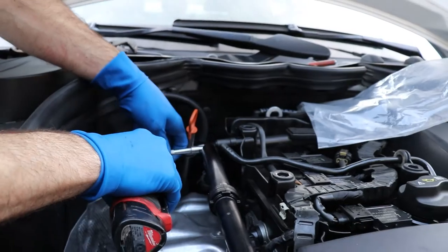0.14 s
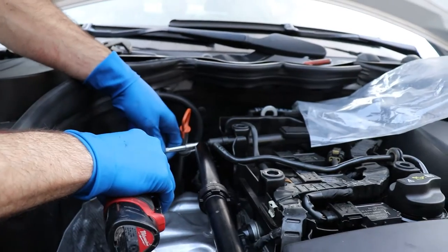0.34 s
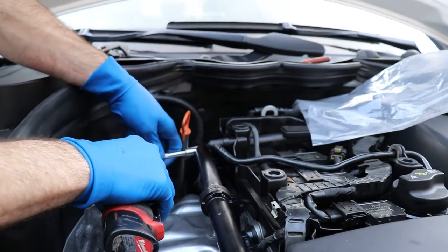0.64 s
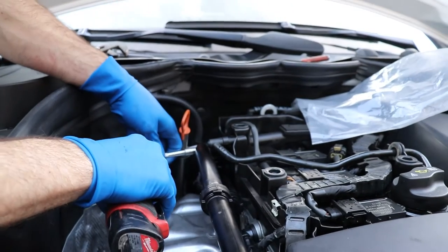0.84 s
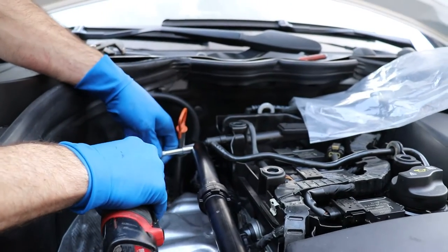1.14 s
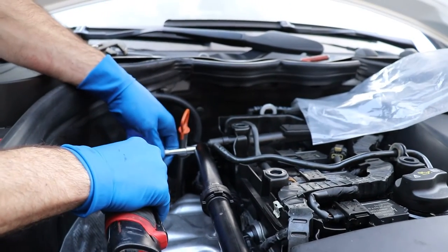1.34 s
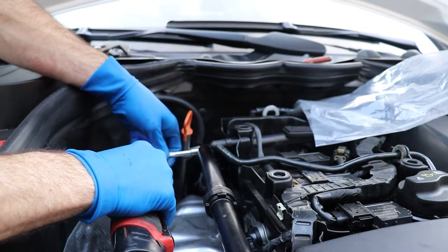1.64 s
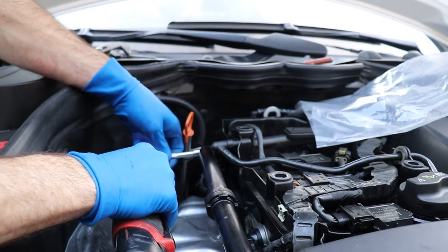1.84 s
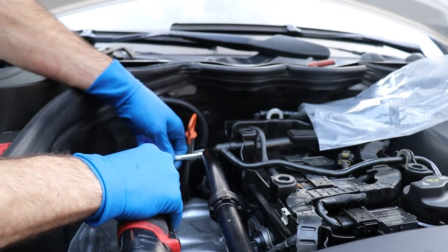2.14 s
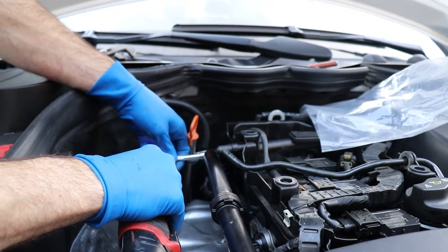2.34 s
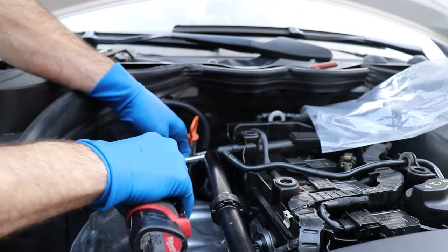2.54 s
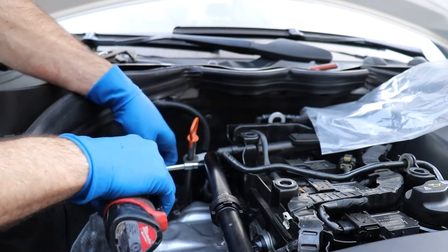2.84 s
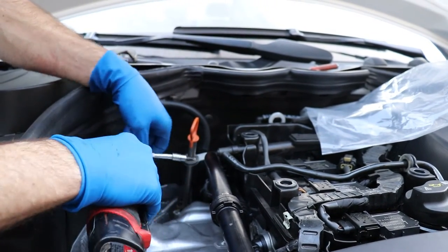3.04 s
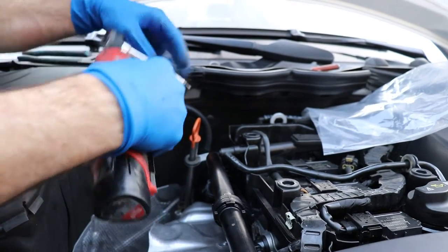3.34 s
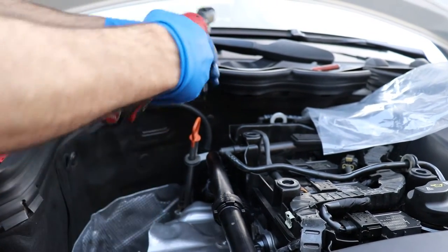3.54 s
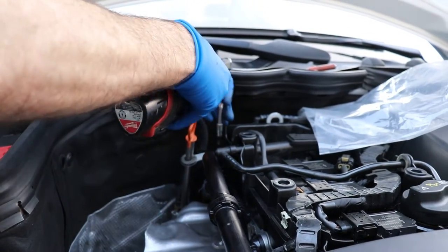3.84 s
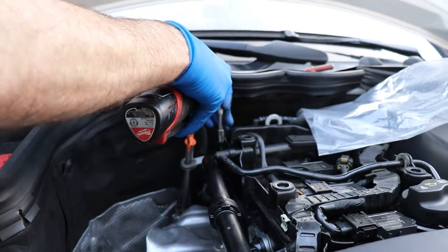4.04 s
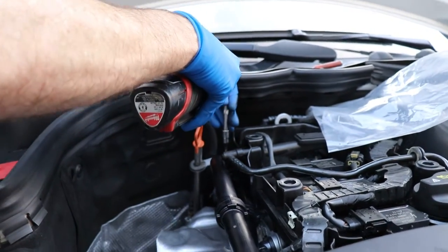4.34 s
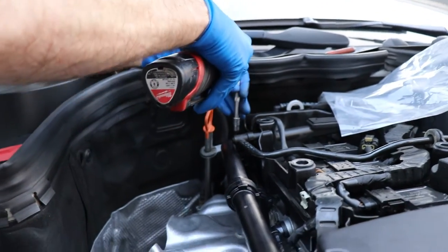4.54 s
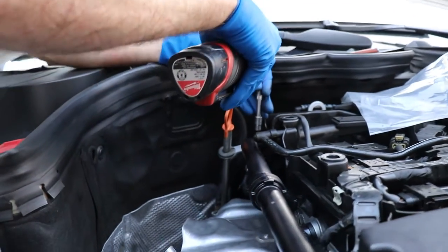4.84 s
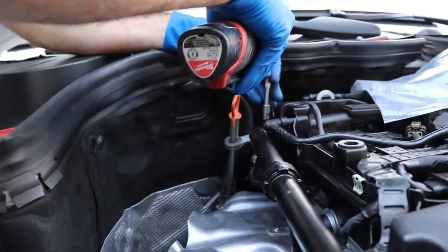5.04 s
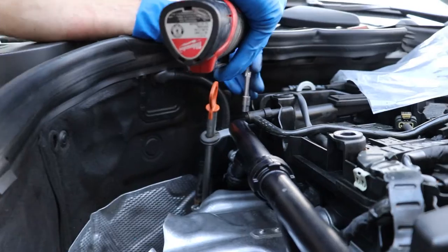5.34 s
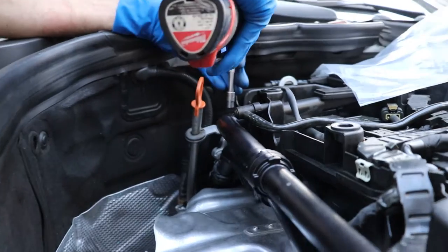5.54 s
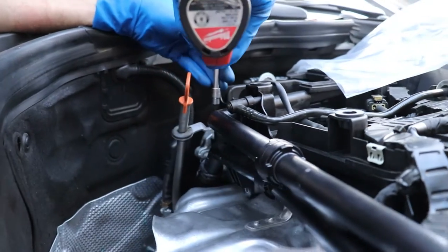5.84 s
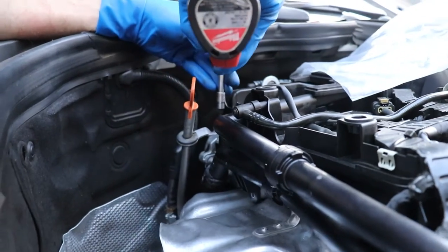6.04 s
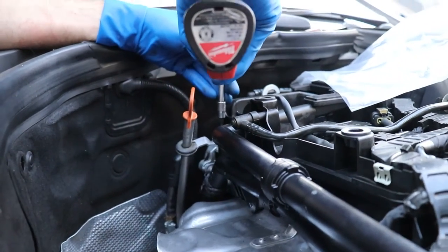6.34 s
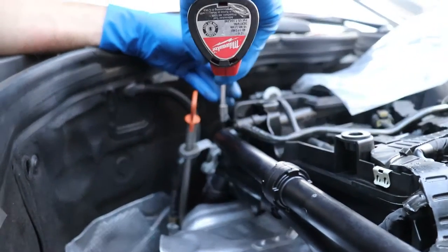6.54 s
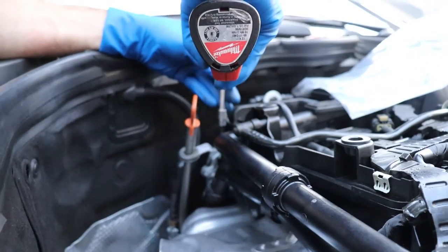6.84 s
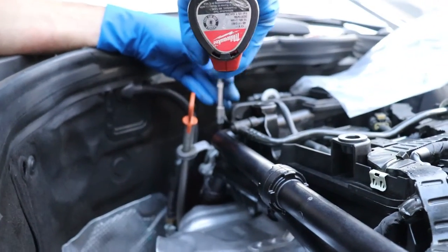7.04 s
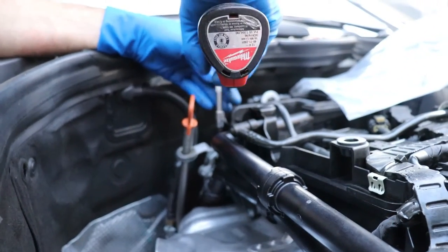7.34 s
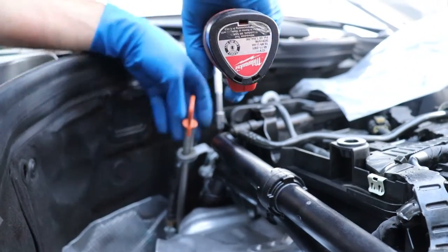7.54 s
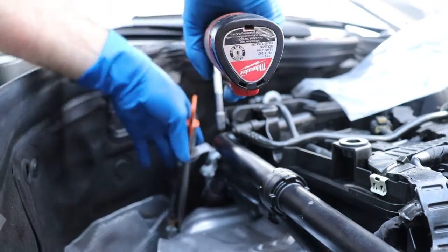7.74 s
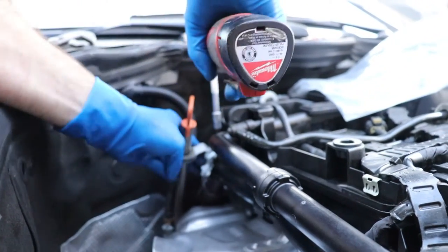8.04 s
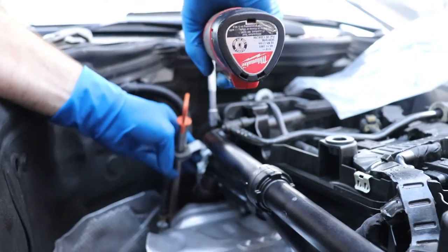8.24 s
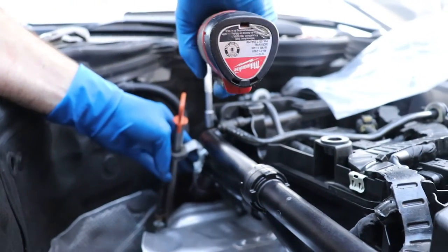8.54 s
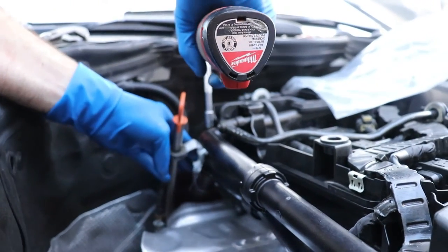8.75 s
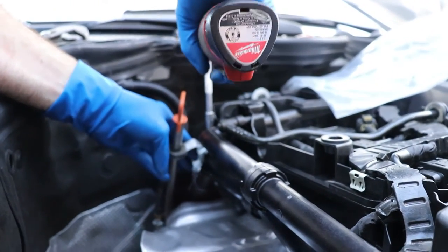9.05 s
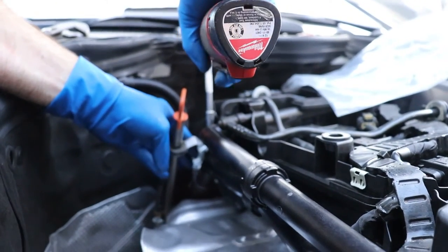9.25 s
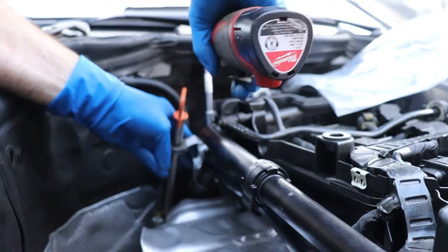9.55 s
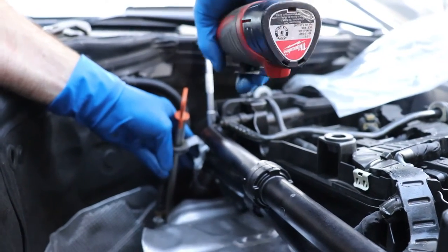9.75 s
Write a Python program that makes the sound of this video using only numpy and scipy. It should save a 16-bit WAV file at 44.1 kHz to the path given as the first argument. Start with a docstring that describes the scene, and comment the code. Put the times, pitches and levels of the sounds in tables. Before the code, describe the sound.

A cordless ratchet buzzes in three harsh bursts that bog down and recover, among sharp metal socket clicks and gritty glove rubs in an engine bay.

```python
"""Socket clicks and gritty glove rubs come before, between and after three cordless ratchet runs, over room noise.
Ratchet: contacts in each crank stroke and loose rattle excite case, head, gears and pawl; gear mesh adds a tone.
Clicks: clattering bounces ring socket modes. Rubs: banded grit. Squeaks: gliding, fluttering tones.
Bumps: low resonances of noise through the mount. Short noise echoes place the tool in an engine bay and garage."""
import sys
import numpy as np
from scipy import signal
from scipy.fft import rfft, irfft
from scipy.io import wavfile
from scipy.ndimage import uniform_filter1d

SR = 44100
rng = np.random.default_rng(int(sys.argv[2]) if len(sys.argv) > 2 else 0)


def wav_record(signal):
    """Record a signal, one row per channel, as 16-bit PCM in the file named by sys.argv[1]."""
    frames = np.transpose(np.atleast_2d(signal))
    bounded = np.clip(frames, -1, 1)
    # unit amplitude maps onto the largest positive 16-bit level
    quanta = np.round(bounded * 32767).astype(np.int16)
    wavfile.write(sys.argv[1], SR, quanta)


N = 436589
T = np.arange(N) / SR  # s

# room and microphone noise spectrum: f/Hz, relative density/dB
AIR_SPECTRUM = [(50, -40), (110, -3), (250, -2), (500, -5), (1000, -6), (2400, -12), (4000, -20),
                (8000, -27), (13000, -30), (16500, -36)]
AIR_DB = -62.5  # rms
ROOM_T60_S, ROOM_DB = 0.17, -18

# bumps through the mount: peak t/s, length/s, deep level/dB, higher level/dB
BUMPS = [(0.18, 0.31, -48, -42), (2.614, 0.16, -73.5, -47.5), (2.728, 0.31, -56, -58.5),
         (3.159, 0.16, -60, -39.5), (3.467, .13, -43.5, -53), (3.889, 0.16, -50, -67),
         (3.983, 0.31, -47, -42), (4.097, 0.21, -43, -58), (4.232, 0.1, -62, -41.5), (6.088, .12, -69, -64),
         (7.2, 0.3, -65, -53), (7.83, 0.36, -39, -46.5), (7.903, .18, -40, -34.5), (8.062, 0.12, -70, -45),
         (8.235, 0.14, -38, -40.5), (8.311, 0.25, -43, -45.5), (9.225, .13, -53.5, -41),
         (9.514, 0.12, -34, -47.5), (9.597, 0.19, -37, -52), (9.687, 0.27, -44, -65)]
# steady mount rumble: [deep, higher] level/dB
MOUNT_RUMBLE_DB = [-67.5, -70.5]
BUMP_RISE_SHARE = 0.45

# gloves and parts rubbing: start t/s, length/s, level/dB, centre f/Hz
RUBS = [(0.042, 0.26, -44.5, 800), (0.275, .11, -55, 1190), (0.399, 0.11, -46.5, 1460),
        (0.611, .08, -58, 2080), (0.774, 0.064, -45, 1030), (1.002, 0.098, -43.5, 1270),
        (1.172, .2, -57, 2500), (2.673, .12, -45.5, 1100), (2.849, 0.095, -55, 2500),
        (3.062, 0.19, -43.5, 643), (3.072, .15, -44.5, 2070), (3.557, 0.37, -53, 2250),
        (3.95, .25, -47.5, 2130), (4.218, 0.082, -50, 1900), (4.601, 0.079, -56, 1860),
        (4.774, 0.068, -49.5, 1980), (4.972, .09, -64, 2040), (5.996, 0.23, -61, 1310),
        (6.278, 0.053, -38.5, 1850), (6.678, 0.27, -62, 1740), (6.965, .33, -58, 1800),
        (7.848, 0.31, -41.5, 1390), (8.057, 0.16, -44.5, 1160), (8.186, 0.29, -43, 1130),
        (9.633, 0.24, -54.5, 2720)]
RUB_TREBLE_DB = -16  # re centre band

# thin squeaks and hollow creaks: start t/s, length/s, first f/Hz, last f/Hz, gain/dB
SQUEAKS = [(0.495, 0.57, 2290, 2200, -69.5), (3.5, 0.15, 333, 353, -47.5), (3.504, 0.11, 2830, 2973, -37),
           (3.53, .11, 3290, 3300, -45.5), (3.603, .16, 2885, 2810, -45.5), (3.824, 0.065, 2130, 2160, -53),
           (3.979, 0.064, 2106, 2140, -47), (4.112, 0.043, 2520, 2260, -43), (4.143, 0.15, 2140, 2230, -54),
           (4.37, 0.055, 2110, 2490, -65.5), (5.111, 0.085, 2800, 2560, -64),
           (5.703, 0.11, 435, 564, -59.5), (5.932, 0.31, 446, 433, -61.5), (6.156, 0.25, 431, 443, -55.5),
           (6.7, 0.156, 496, 496, -53), (6.949, 0.22, 496, 516, -52.5), (6.954, 0.085, 419, 405, -54),
           (9.658, 0.099, 7300, 7330, -48.5), (9.659, 0.08, 850, 830, -50), (9.832, 0.096, 4900, 7800, -56),
           (9.852, 0.12, 4070, 3980, -52)]
WAVER_SHARE = 0.02  # rms pitch deviation
FLUTTER_DEPTH, SLIP_CYCLES = 1.3, 7  # rms strength deviation; smoothing length in tone cycles

# socket and tool knocks: t/s, body peak/dB, strongest f/Hz, treble peak re body/dB, thud peak re body/dB
CLICKS = [(0.057, -35, 786, -15, -4), (0.086, -28.5, 764, -29, 2.5), (0.114, -24.5, 760, -32, -3),
          (0.139, -27.5, 751, -27, -4), (0.159, -29, 760, -13, 0), (0.186, -9, 1620, -23.5, -17),
          (0.222, -24, 1420, -27, -12), (0.314, -32.5, 1000, -38, -20), (0.408, -33, 1990, -12, -29),
          (0.436, -13.5, 1740, -23.5, -22.5), (0.627, -41, 2030, -15, -24), (0.654, -41, 2940, -13, -25),
          (0.781, -22, 1890, -19, -23), (0.832, -34, 755, -18, -11), (1.011, -33, 1480, -17, -32),
          (1.026, -22, 1490, -13, -33), (1.183, -35, 2880, -16, -34), (1.198, -28.5, 2420, -10, -21),
          (1.225, -36, 2650, -6, -25), (2.621, -1.5, 2500, -28, -35), (2.64, -11.5, 2790, -5, -35),
          (2.687, -18, 2070, -0.5, -32), (2.796, -39, 3020, -14, -22), (2.858, -34, 2520, -13, -23),
          (2.891, -30.5, 2464, -14.5, -25), (3.535, -26, 2870, -18, -26), (3.593, -20.5, 3030, 3, -32),
          (3.674, -32, 2920, -11, -15), (3.699, -28, 2900, -10, -17), (3.719, -35, 1760, -7, -15),
          (3.761, -35, 2230, -14, -16), (3.961, -29.5, 3700, -0.5, -16), (4.03, -2.5, 2200, -26, -47),
          (4.049, -23, 2100, -14.5, -29), (4.093, -30.5, 1850, -11, -24), (4.227, -38.5, 2130, -26, -11),
          (4.505, -46.5, 1130, -1, -19), (4.606, -26, 2220, -37, -36), (4.627, -31.5, 2370, -36, -27),
          (4.65, -29, 1490, -44, -41), (4.713, -45, 1460, -21, -19), (4.745, -45, 2370, -11, -18),
          (4.786, -24.5, 2310, -27, -37), (4.8, -34.5, 2360, -29, -32), (4.842, -27, 2310, -29, -27),
          (5.008, -47, 1950, -4, -13.5), (6.008, -33, 2586, -32, -24), (6.087, -19, 2280, -26.5, -9),
          (6.287, -18.5, 1660, -24.5, -39), (6.302, -18, 1950, -25.5, -27), (6.328, -28.5, 2500, -11, -17),
          (6.402, -11, 2340, -19, -37), (6.685, -29.5, 2360, -48, -30), (6.791, -24, 2280, -16.5, -26),
          (6.806, -23, 2310, -23, -29), (7.024, -36, 2130, -33, -18), (7.04, -26, 2300, -31, -21),
          (7.076, -34, 1360, -18, -13), (7.139, -14.5, 2330, -10.5, -20), (7.923, -17.5, 1870, -12, -16),
          (7.952, -14, 1580, -1, -24), (8.021, -16, 880, -2, -32), (8.1, -17.5, 920, -35, -23),
          (8.145, -28.5, 1150, -24, -24), (8.224, -30, 1110, -21.5, -12.5), (8.25, -22.5, 1090, -22, -13),
          (8.288, -28, 1120, -21, -15), (9.6, -11.5, 1430, -12, -38), (9.624, -7.5, 2750, -21, -42)]
# socket modes: f/Hz, gain/dB
SOCKET_MODES = [(800, -4), (1150, -3), (1420, 3), (1700, 0), (1920, 0), (2230, 1), (2610, 0), (2950, 1),
                (3350, 0), (3950, -12), (4600, -16), (5300, -18), (5900, -16)]
CLICK_SPREAD_OCT = 0.77  # half-gain distance from the strongest ring
CLICK_RING_T60_S = 0.018  # modes damped by a gloved hand
CLICK_BOUNCE_T60_S = 0.027
CLICK_CRACK_DB, CLICK_TAIL_DB, CLICK_TAIL_T60_S = -7.5, -18.5, 0.14  # crack re ring; tail re bounces

# winding whine as the motor starts: start t/s, rise length/s, gain/dB
CHOP_BURSTS = [(1.269, 0.039, -33), (7.131, 0.02, -37), (8.319, 0.029, -33.5)]
CHOP_HZ = 1860
# chopper harmonics from the first up: gain/dB
CHOP_HARMONICS_DB = [11, -1, -3.5, -27, -27.5, -30.5]

# pawl drops over a last tooth as the crank coasts to rest: t/s, peak/dB
SNAPS = [(2.6853, -6.5), (7.9533, -15), (8.0212, -17)]
SNAP_T60_S = 0.02

# motor runs: on t/s, off t/s, full-speed levels/dB, end levels/dB (each: case, head, gears, pawl)
RUNS = [(1.271, 2.613, (-22.5, -23, -22.5, -23), (-20, -19, -25, -26)),
        (7.126, 7.858, (-28, -22.5, -28, -20.5), (-26, -23, -29.5, -25)),
        (8.327, 9.595, (-22.5, -21.5, -23, -23.5), (-23.5, -20, -23, -25))]
# crank speed per run, slowed by screw load: t/s, rate/(strokes/s)
CRANK_SPEED = [
    [(1.33, 41.4), (1.406, 70.6), (1.531, 76.4), (2.089, 72.8), (2.21, 47.6), (2.338, 25.1), (2.443, 71.7),
     (2.51, 71.9), (2.6, 33.2)],
    [(7.181, 44.2), (7.27, 40.2), (7.423, 21.8), (7.474, 10.4), (7.59, 47.8), (7.65, 34.0), (7.739, 27.7),
     (7.85, 12.6)],
    [(8.387, 46.5), (8.496, 73.0), (8.649, 49.1), (8.789, 32.7), (8.86, 64.9), (8.965, 75.0), (9.122, 51),
     (9.2, 65), (9.29, 76), (9.43, 76), (9.545, 48.5), (9.61, 60)],
]
# contacts in a stroke: place/stroke, timing spread/stroke, size scatter/dB, case, head, gears, pawl gains/dB
STROKE_CONTACTS = [(-.3, 0.012, 2, -8, -3, -6, -13), (-.13, .012, 2, -7.5, 1.5, -8, -2.5),
                   (0.068, .03, 5, -8, 0.5, -14, 1.5), (.24, 0.005, 2, 2.5, 3.5, 0.5, -13.5)]
# housing modes: f/Hz, width/Hz, gain/dB
CASE_MODES = [(709, 180, -13.5), (995, 123, -3), (1176, 120, -7), (1518, 210, -2)]
# ratchet head modes: f/Hz, width/Hz, gain/dB
HEAD_MODES = [(1861, 220, 3), (2277, 620, 3), (2670, 180, 7), (2820, 540, 2), (3420, 510, -7.5)]
# gear train modes: f/Hz, width/Hz, gain/dB
GEAR_MODES = [(3650, 550, -2), (4010, 940, 0), (5210, 600, -4), (5970, 540, -1), (7580, 200, 0.5),
              (8020, 420, -1.5), (9480, 3600, -7)]
# pawl modes: f/Hz, width/Hz, gain/dB
PAWL_MODES = [(11000, 440, -12.5), (12377, 380, -1.5), (13200, 350, -5.5), (13540, 420, -11.5),
              (15000, 260, -11.5)]
# loose rattle excitation re scuffle: [case, head, gears, pawl] level/dB
RATTLE_DB = [6, 4, 3, -27.5]
# repeatable clean blow re scuffle: [case, head, gears, pawl] level/dB
CLEAN_BLOW_DB = [8, 1, -6, -8]
# rattle modulation as the crank reverses: [case, head, gears, pawl] depth/1
SLACK_DEPTH = [.2, .3, .6, .8]
SPIN_UP_S, RUN_DOWN_S = 0.042, 0.1
# start level re full speed: [case, head, gears, pawl] level/dB
SPIN_UP_DB = [-19, -19, -39.5, -44.5]
# run-down level re end of run: [case, head, gears, pawl] level/dB
RUN_DOWN_DB = [-19.5, -33, -44, -50.5]
# gear mesh tone near 75 strokes/s: one gain/dB per run
MESH_DB = [-32.5, -35, -28.5]
MESH_TEETH_PER_STROKE = 52
GRIP_DRIFT_DB = 2.3  # wander of each mode as the grip shifts
SLOW_BLOW_POWER, RATTLE_SPEED_POWER = 0.25, 0.35  # blows grow as speed falls; rattle grows with speed
SHARED_SCATTER, OWN_SCATTER = 0.5, 1.0  # contact size scatter: common to all parts; per part

TOP_HZ = 15900


def undb(db):
    """Amplitude ratio from dB."""
    return 10 ** (np.asarray(db) / 20)


def level(x, db):
    """Scale to an rms level in dB."""
    return x * undb(db) / np.sqrt(np.mean(x ** 2))


def band(x, lo_hz, hi_hz, order=2):
    """Butterworth band-pass."""
    return signal.sosfilt(signal.butter(order, [lo_hz, hi_hz], "bandpass", fs=SR, output="sos"), x)


def ring(x, modes, drift_db=0.):
    """Parallel resonances of alternating sign, each with a wandering gain."""
    knots = np.arange(0, len(x) + 3000, 3000)
    out = np.zeros(len(x))
    for k, (hz, width_hz, db) in enumerate(modes):
        drift = np.interp(np.arange(len(x)), knots, rng.standard_normal(len(knots)))
        gain = (-1) ** k * undb(db + drift_db * drift)
        b, a = signal.iirpeak(hz, hz / width_hz, SR)
        out += gain * signal.lfilter(b, a, x)
    return out


def grit(scatter_db, size):
    """Dense ticks of very unequal size."""
    return rng.standard_normal(size) * undb(scatter_db * rng.exponential(size=size))


def smooth_random(count, window):
    """Slow random curve of unit rms."""
    return level(uniform_filter1d(rng.standard_normal(count), size=window), 0)


def air():
    """Steady hum and hiss of the room and microphone: shaped noise."""
    hz, db = np.transpose(AIR_SPECTRUM)
    f_hz = np.arange(N // 2 + 1) * SR / N + 1
    shape = undb(np.interp(np.log(f_hz), np.log(hz), db))
    return level(irfft(rfft(rng.standard_normal(N)) * shape, N), AIR_DB)


def mount_bumps():
    """Dull bumps swell over steady rumble: noise through two groups of low mount modes."""
    gains = undb(MOUNT_RUMBLE_DB)[:, None] * np.ones(N)
    for s, length_s, *db in BUMPS:
        i = slice(max(0, int((s - length_s) * SR)), int((s + length_s) * SR))
        start_s = s - BUMP_RISE_SHARE * length_s
        end_s = s + (1 - BUMP_RISE_SHARE) * length_s
        swell = np.interp(T[i], [start_s, s, end_s], [0, 1, 0])
        gains[:, i] += undb(db)[:, None] * swell ** 2
    # f/Hz, width/Hz, gain/dB
    deep_modes = [(97, 18, -9.5), (129, 32, 0.5)]
    higher_modes = [(204, 35, 1.5), (280, 69, -2.0)]
    deep = level(ring(rng.standard_normal(N), deep_modes), 0)
    higher = level(ring(rng.standard_normal(N), higher_modes), 0)
    return deep * gains[0] + higher * gains[1]


def rubs():
    """Gritty friction swells, judders and trails off in a centre and a treble band."""
    out = np.zeros(N)
    for s, length_s, db, hz in RUBS:
        i = np.arange(int(s * SR), int((s + length_s) * SR))
        swell = np.interp(T[i] - s, [0, 0.3 * length_s, length_s], [0, 1, 0])
        judder = 1 + 0.5 * np.sin(np.cumsum(rng.random(len(i))) / 60)
        friction = grit(2.76, len(i)) * swell * judder
        out[i] += level(band(friction, 0.49 * hz, 1.55 * hz, order=4), db)
        out[i] += level(band(friction, 3200, 8200), db + RUB_TREBLE_DB)
    return out


def squeaks():
    """Gliding tones whose strength flutters as the contact slips."""
    out = np.zeros(N)
    for s, length_s, first_hz, last_hz, db in SQUEAKS:
        i = np.arange(int(s * SR), min(int((s + length_s) * SR), N))
        share = np.clip((T[i] - s) / length_s, 0, 1)
        window = int(SLIP_CYCLES * SR / first_hz)
        flutter = 1.5 + FLUTTER_DEPTH * smooth_random(len(i), window)
        waver = 1 + WAVER_SHARE * smooth_random(len(i), window)
        glide_hz = first_hz + (last_hz - first_hz) * np.sqrt(share)
        tone = np.sin(2 * np.pi * np.cumsum(waver * glide_hz) / SR)
        swell = np.abs(np.sin(np.pi * share ** 0.66)) ** 0.79
        out[i] += undb(db) * flutter * swell * tone
    return out


def clicks():
    """Each knock clatters and rings the socket modes near its strongest pitch, with tick and thud."""
    out, t = np.zeros(N + 8000), T[:8000]
    ring_t = T[:2000]
    hz, mode_db = np.transpose(SOCKET_MODES)
    for s, db, peak_hz, treble_db, thud_db in CLICKS:
        spot, detune, sign = rng.standard_normal((3, len(hz), 1))
        # each blow lands on another spot
        distance_oct = np.log2(hz / peak_hz)[:, None]
        gain = undb(mode_db[:, None] + 2.5 * spot) / (1 + (distance_oct / CLICK_SPREAD_OCT) ** 2)
        tones = np.sin(2 * np.pi * hz[:, None] * (1 + 0.025 * detune) * ring_t)
        modes = np.sum(gain * tones * np.sign(sign), axis=0) * undb(-60 * ring_t / CLICK_RING_T60_S)
        # quick bounces, then softer chatter of loose parts
        noise = grit(1.5, len(t)) * (1 - np.exp(-t / 0.0005))
        bounces = noise * undb(-60 * t / CLICK_BOUNCE_T60_S)
        chatter = noise * undb(CLICK_TAIL_DB - 60 * t / CLICK_TAIL_T60_S)
        clatter = bounces + chatter
        rung = signal.fftconvolve(clatter, modes)[:len(t)]
        body = level(band(rung, 0.45 * peak_hz, 8200, order=3), 0)
        body += level(band(clatter, 0.62 * peak_hz, 1.5 * peak_hz, order=4), CLICK_CRACK_DB)
        # stronger treble reaches higher
        top_hz = np.clip(14500 + 300 * treble_db, 6000, 15500)
        tick = band(clatter, 4600, top_hz, order=3)
        thud = band(rng.standard_normal(len(t)), 300, 900) * undb(-60 * t / 0.11) * np.minimum(t / 0.001, 1)
        layers = ((0, body), (treble_db, tick), (thud_db, thud))
        knock = sum(undb(layer_db) * x / np.abs(x).max() for layer_db, x in layers)
        start = int(s * SR)
        out[start:start + len(t)] += undb(db) * knock
    return out[:N]


def chopper():
    """Chopped motor current whines in the windings: harmonics of the switching rate in brief swells."""
    whine = np.zeros(N)
    for k, db in enumerate(CHOP_HARMONICS_DB):
        whine += undb(db) * np.sin(2 * np.pi * (k + 1) * CHOP_HZ * T)
    swell = np.zeros(N)
    for s, length_s, db in CHOP_BURSTS:
        swell += undb(db) * np.interp(T, [s, s + length_s, s + length_s + 0.005], [0, 1, 0])
    return whine * swell


def snaps():
    """Lone decaying scuffles ring the pawl."""
    out, t = np.zeros(N), T[:4000]
    for s, db in SNAPS:
        snap = ring(grit(1.3, len(t)) * undb(-60 * t / SNAP_T60_S), PAWL_MODES)
        start = int(s * SR)
        out[start:start + len(t)] += undb(db) * snap / np.abs(snap).max()
    return out


def stroke_hits(strokes, speed, count):
    """Impulses per part at fixed places in each stroke, with scattered timing and size."""
    hits = np.zeros((len(RATTLE_DB), len(strokes)))
    for place, spread, scatter_db, *part_db in STROKE_CONTACTS:
        chance = np.clip(rng.standard_normal((6, len(count))), -1.5, 1.5)
        at = np.searchsorted(strokes, count + place + spread * chance[0]) % len(strokes)
        scatter = SHARED_SCATTER * chance[1] + OWN_SCATTER * chance[2:]
        size = undb(np.array(part_db)[:, None] + scatter_db * scatter)
        hits[:, at] += size * speed[at] ** -SLOW_BLOW_POWER
    return hits


def gear_mesh(t, speed, run_on_s, crank_s, mesh_db):
    """Tooth contacts make a tone that follows crank speed and grows with its cube."""
    speed = uniform_filter1d(speed, size=2000)  # rotor inertia
    wear = smooth_random(len(t), 1500)  # uneven teeth
    fade = np.interp(t, [run_on_s, crank_s[0], crank_s[-2], crank_s[-1]], [0, 1, 1, 0])
    bite = (1 + 0.5 * wear) * (speed / 75) ** 3 * fade
    return undb(mesh_db) * bite * np.sin(2 * np.pi * MESH_TEETH_PER_STROKE * np.cumsum(speed) / SR)


def ratchet(crank, run, mesh_db):
    """One run: stroke contacts and loose rattle ring four parts of the tool; gear mesh adds a tone."""
    crank_s, rate = np.transpose(crank)
    on_s, off_s, full_db, end_db = run
    when_s = [on_s, on_s + SPIN_UP_S, off_s, off_s + RUN_DOWN_S]
    span = slice(int(when_s[0] * SR), int(when_s[-1] * SR))
    t = T[span]
    speed = np.interp(t, crank_s, rate)
    strokes = np.cumsum(speed) / SR
    strokes = strokes - np.interp(crank_s[0], t, strokes)
    count = np.arange(int(np.interp(crank_s[-1], t, strokes)) + 1)
    hits = stroke_hits(strokes, speed, count)
    part_modes = (CASE_MODES, HEAD_MODES, GEAR_MODES, PAWL_MODES)
    scuffle_decay_s = (0.0028, 0.0026, 0.0013, 0.0023)
    sound = np.zeros(len(t))
    for k, (modes, decay_s) in enumerate(zip(part_modes, scuffle_decay_s)):
        # a contact is a short scuffle of bounces besides the clean blow
        push = signal.lfilter([1], [1, -np.exp(-1 / (decay_s * SR))], hits[k])
        scuffle = push * grit(1.3, len(t))
        slack = 1 + SLACK_DEPTH[k] * np.cos(2 * np.pi * (strokes + 0.12))
        rattle = grit(2.0, len(t)) * slack * speed ** RATTLE_SPEED_POWER
        drive = level(hits[k], CLEAN_BLOW_DB[k]) + level(scuffle, 0) + level(rattle, RATTLE_DB[k])
        part = level(ring(drive, modes, GRIP_DRIFT_DB), 0)
        db = [full_db[k] + SPIN_UP_DB[k], full_db[k], end_db[k], end_db[k] + RUN_DOWN_DB[k]]
        sound += part * undb(np.interp(t, when_s, db))
    mesh = gear_mesh(t, speed, on_s, crank_s, mesh_db)
    out = np.zeros(N)
    out[span] = band(sound + mesh, 600, 18000, order=4)
    return out


def room(dry):
    """Echoes from the engine bay and walls: convolution with decaying noise."""
    t = T[:SR // 2]
    echo = band(rng.standard_normal(len(t)), 500, 11000) * undb(-60 * t / ROOM_T60_S) * (t > 0.003)
    return undb(ROOM_DB) * signal.fftconvolve(dry, echo / np.sqrt(np.sum(echo ** 2)))[:N]


def scene():
    """Tool and handling sounds with room echoes, plus mount bumps and air."""
    runs = sum(ratchet(*each) for each in zip(CRANK_SPEED, RUNS, MESH_DB))
    dry = rubs() + squeaks() + clicks() + chopper() + snaps() + runs
    return (dry + room(dry) + mount_bumps() + air())[None]


def record(dry):
    """Soft-round the loudest peaks, then cut both ends of the spectrum."""
    rounded = np.tanh(0.69 * dry) / 0.7
    low_cut = signal.butter(3, 90, "highpass", fs=SR, output="sos")
    top_cut = signal.ellip(10, 0.2, 80, TOP_HZ, fs=SR, output="sos")
    return signal.sosfilt(top_cut, signal.sosfilt(low_cut, rounded))


dry = scene()
out = record(dry)
wav_record(out)
```